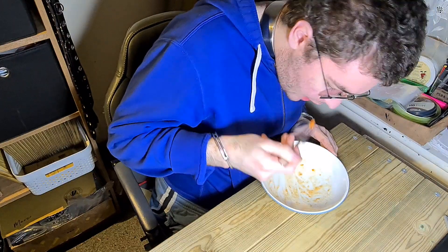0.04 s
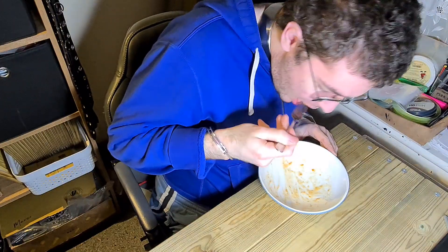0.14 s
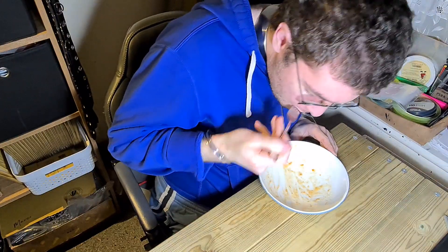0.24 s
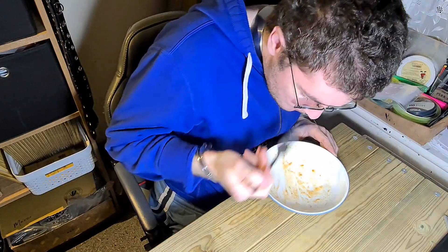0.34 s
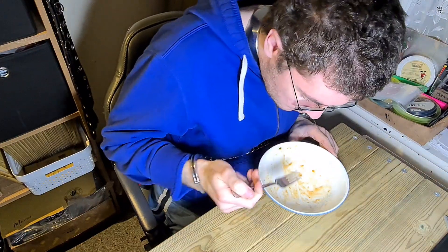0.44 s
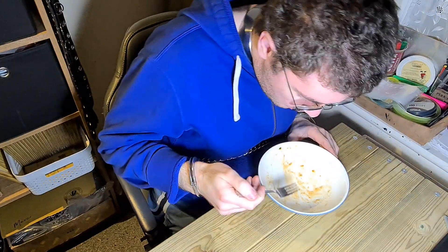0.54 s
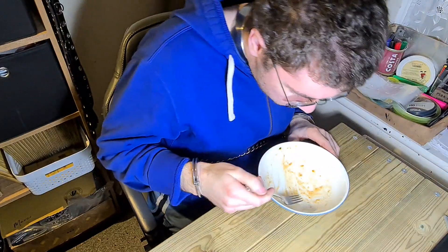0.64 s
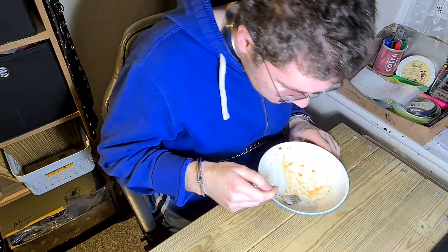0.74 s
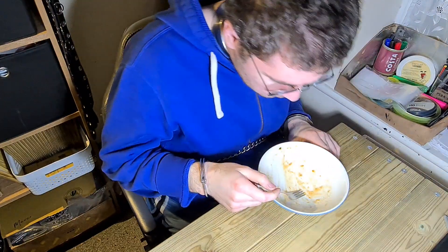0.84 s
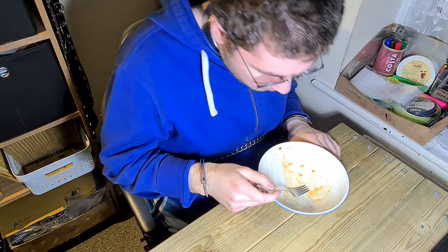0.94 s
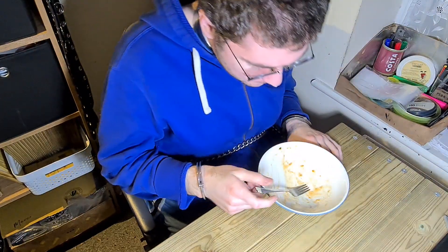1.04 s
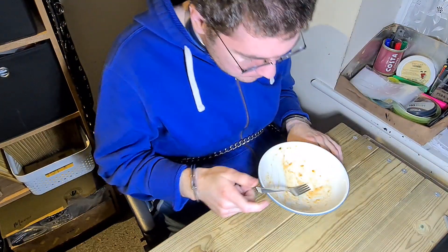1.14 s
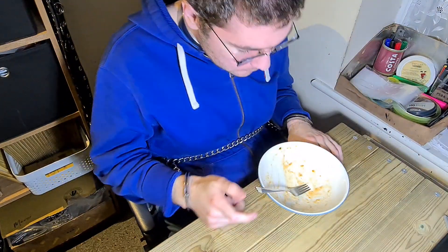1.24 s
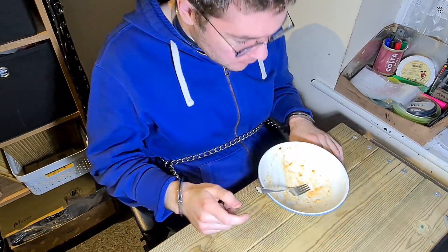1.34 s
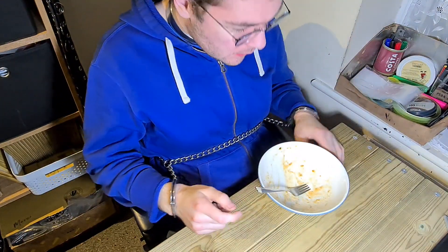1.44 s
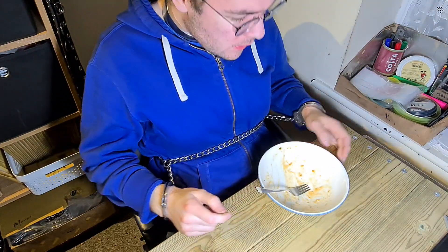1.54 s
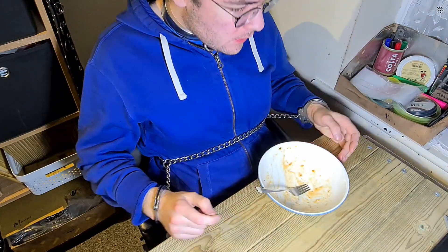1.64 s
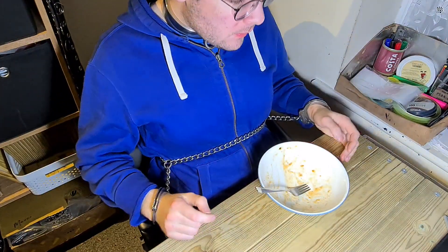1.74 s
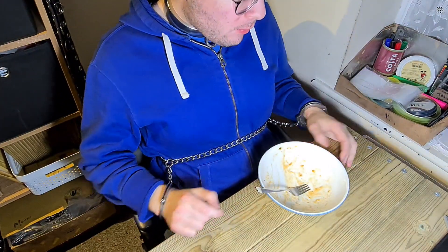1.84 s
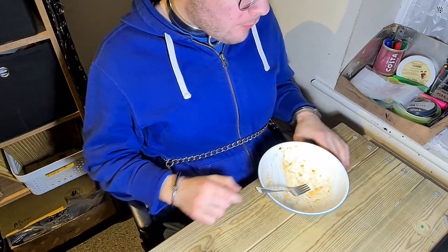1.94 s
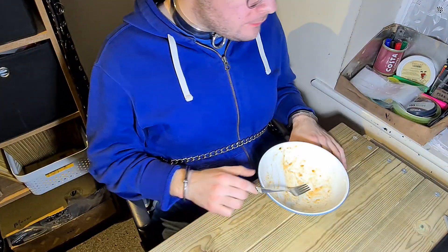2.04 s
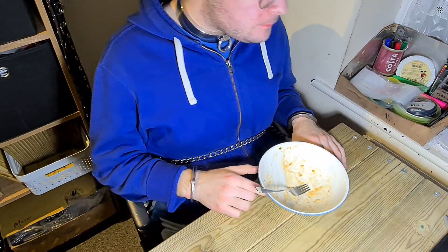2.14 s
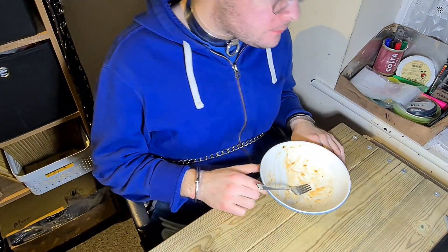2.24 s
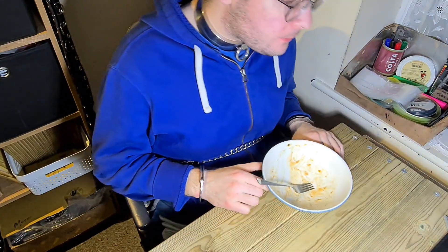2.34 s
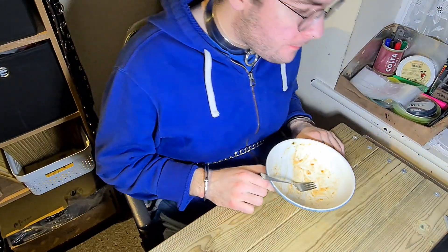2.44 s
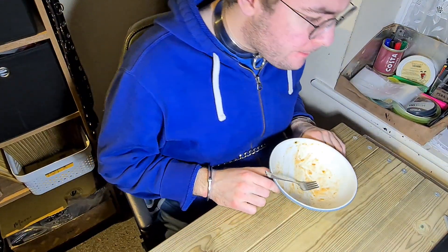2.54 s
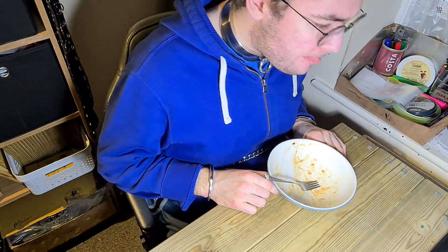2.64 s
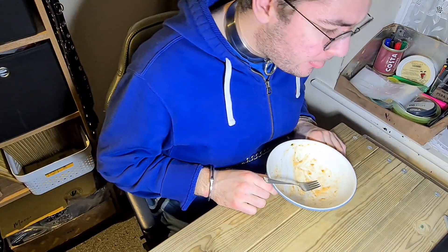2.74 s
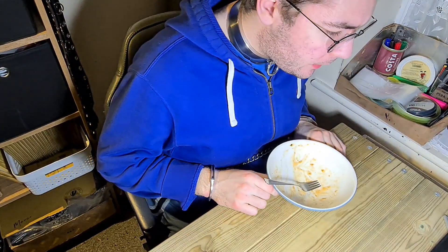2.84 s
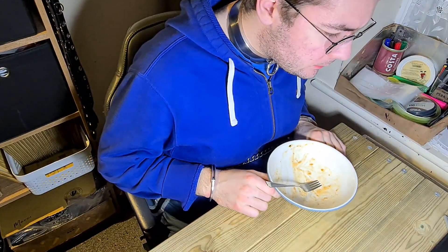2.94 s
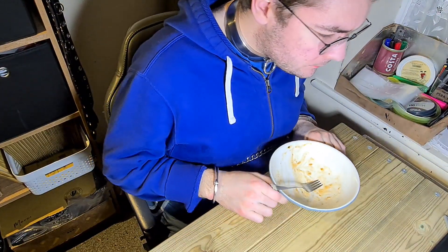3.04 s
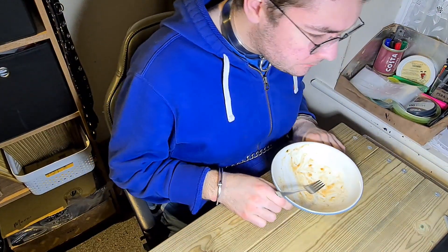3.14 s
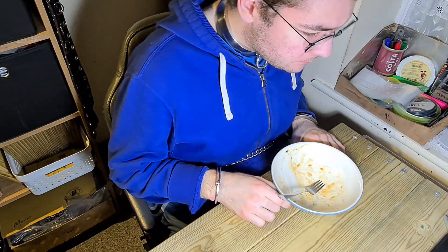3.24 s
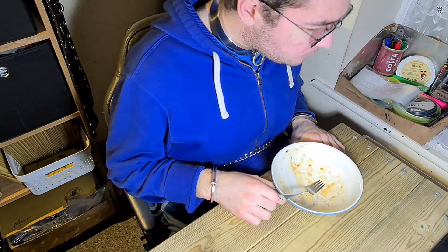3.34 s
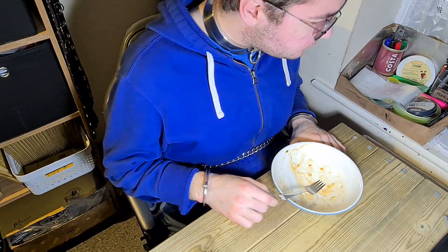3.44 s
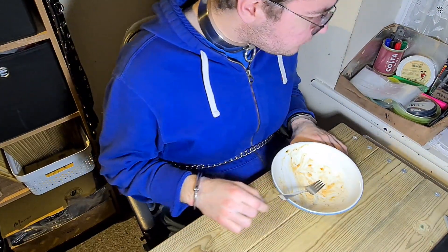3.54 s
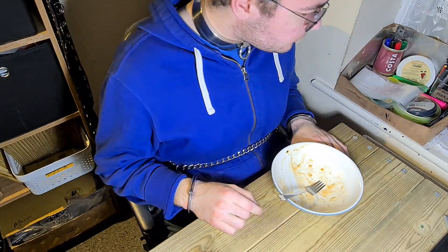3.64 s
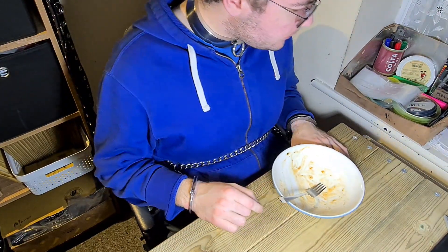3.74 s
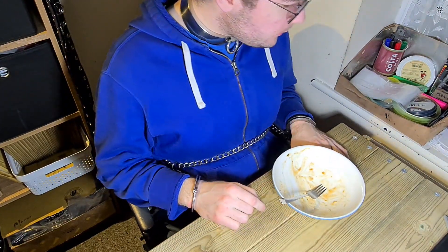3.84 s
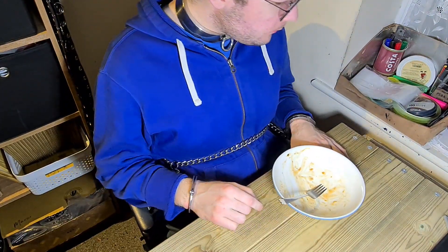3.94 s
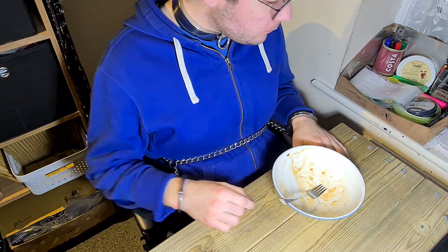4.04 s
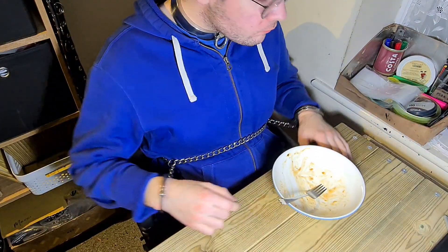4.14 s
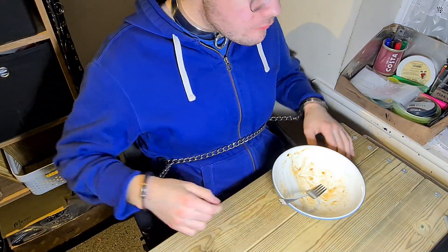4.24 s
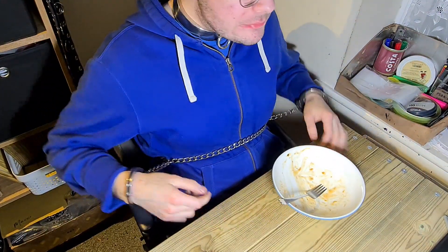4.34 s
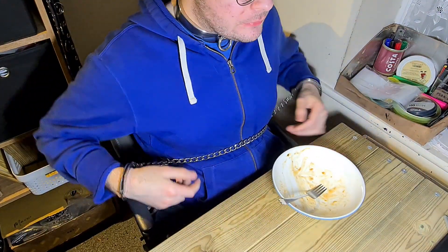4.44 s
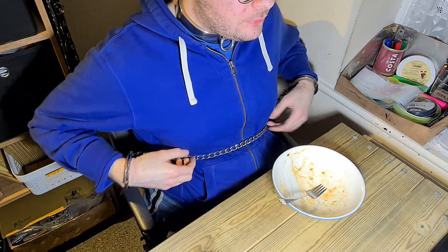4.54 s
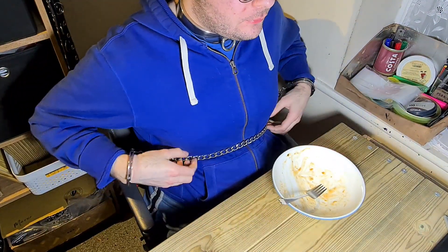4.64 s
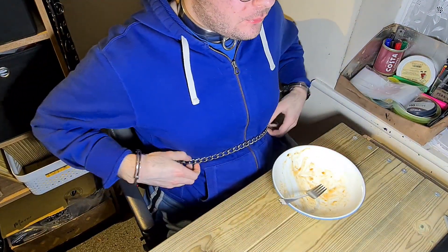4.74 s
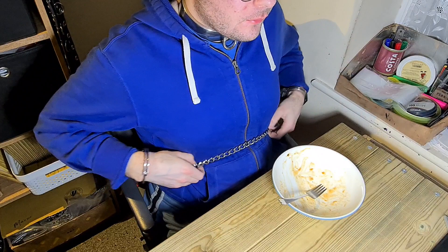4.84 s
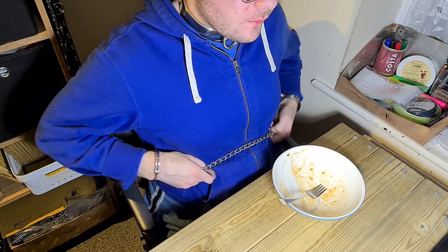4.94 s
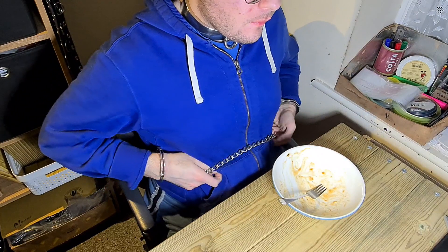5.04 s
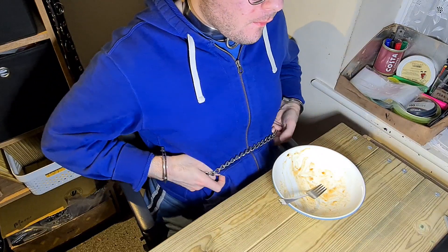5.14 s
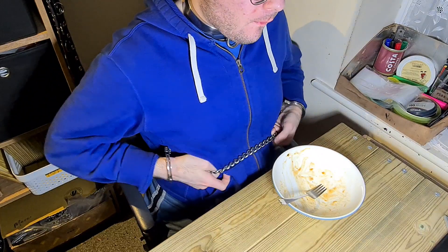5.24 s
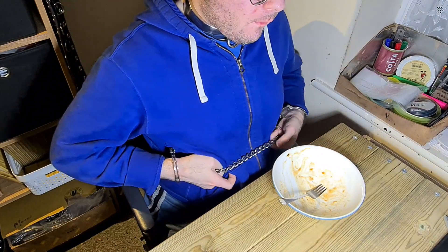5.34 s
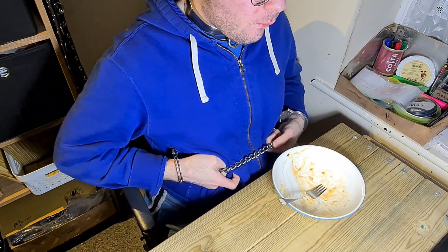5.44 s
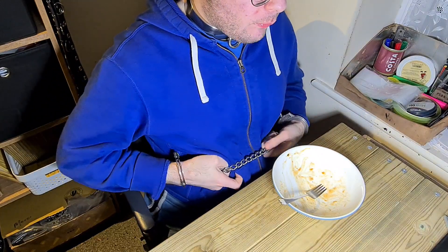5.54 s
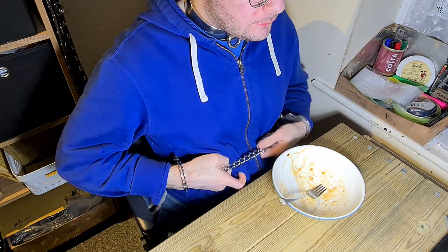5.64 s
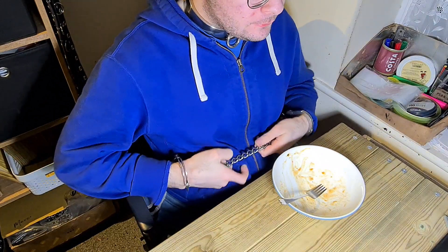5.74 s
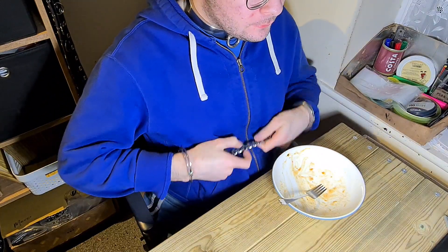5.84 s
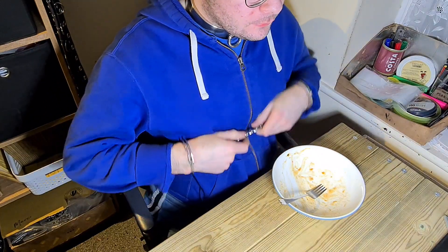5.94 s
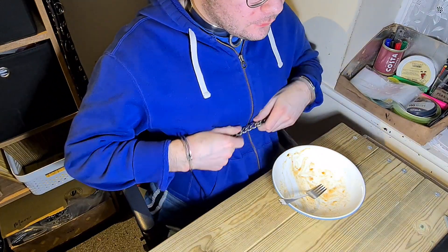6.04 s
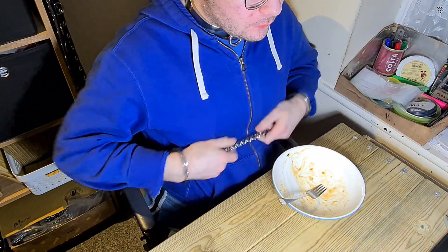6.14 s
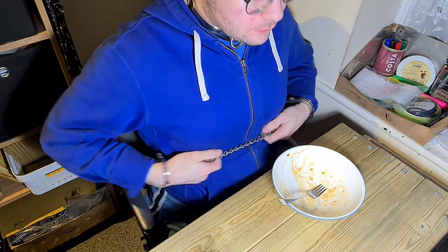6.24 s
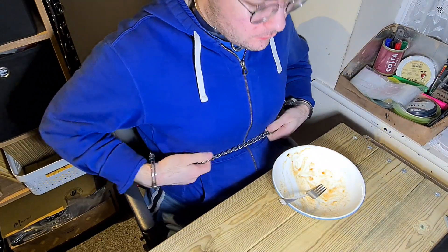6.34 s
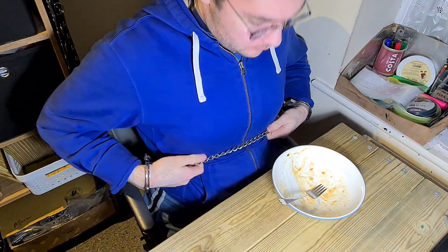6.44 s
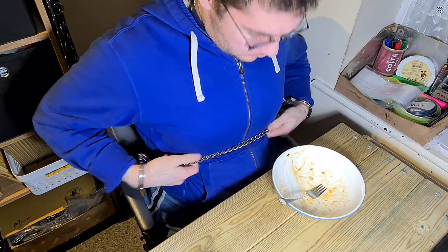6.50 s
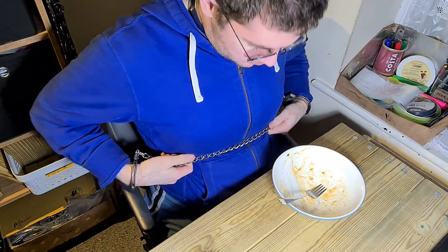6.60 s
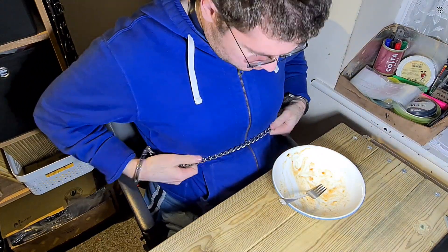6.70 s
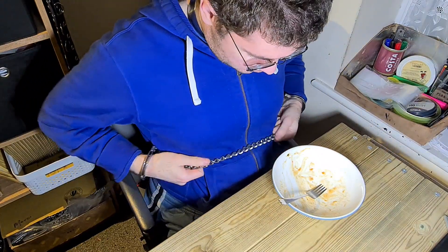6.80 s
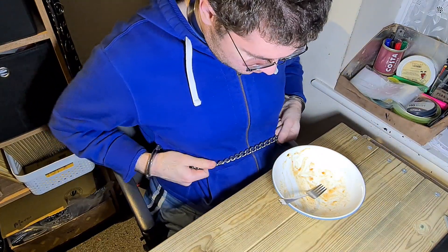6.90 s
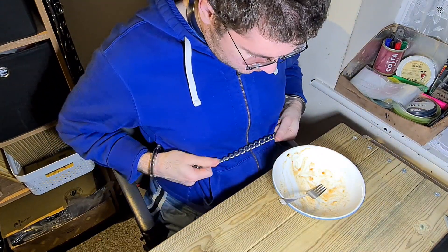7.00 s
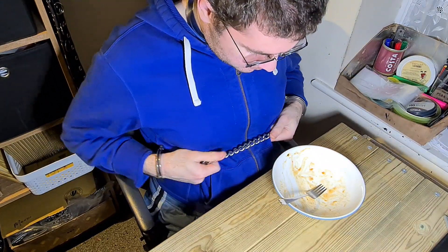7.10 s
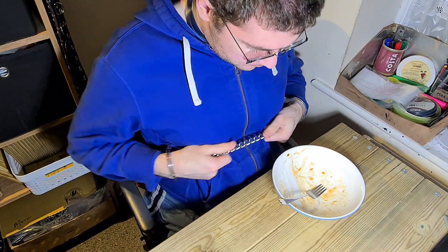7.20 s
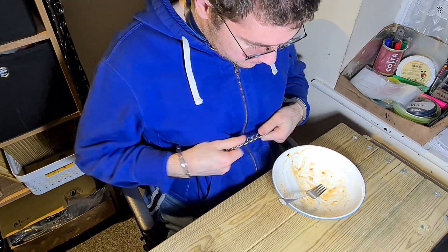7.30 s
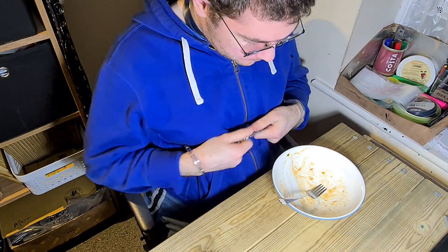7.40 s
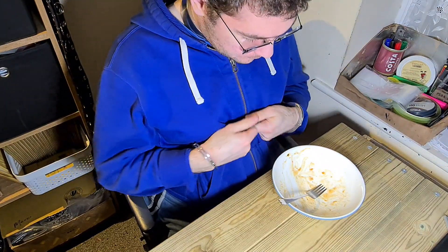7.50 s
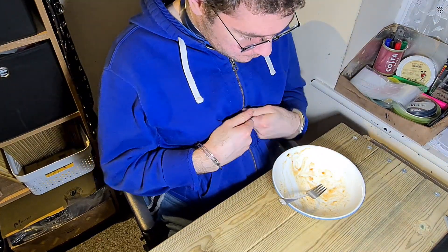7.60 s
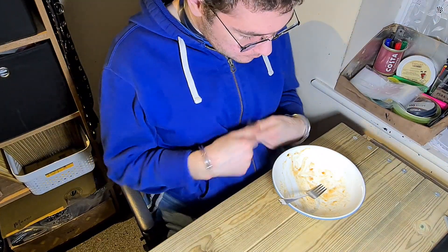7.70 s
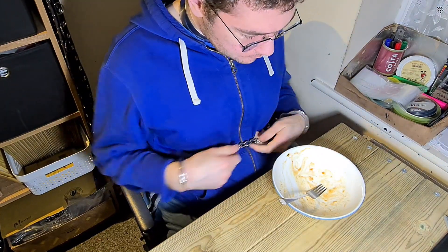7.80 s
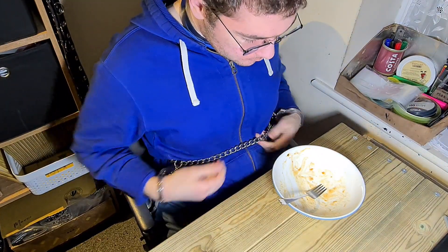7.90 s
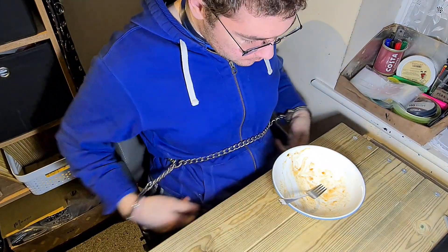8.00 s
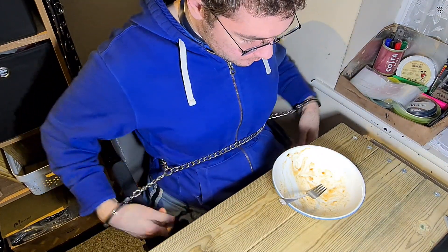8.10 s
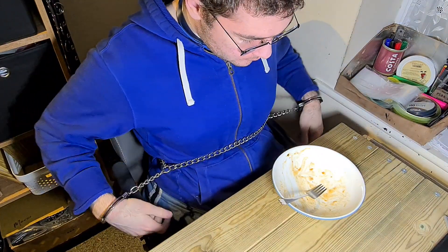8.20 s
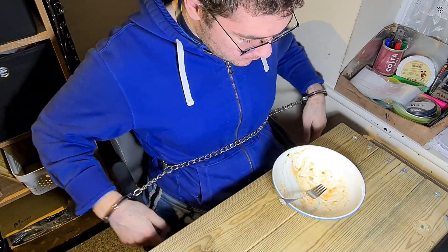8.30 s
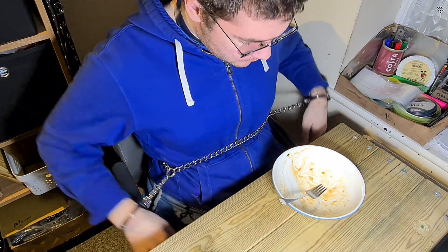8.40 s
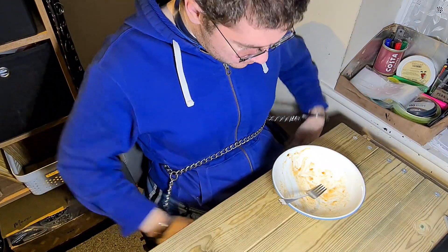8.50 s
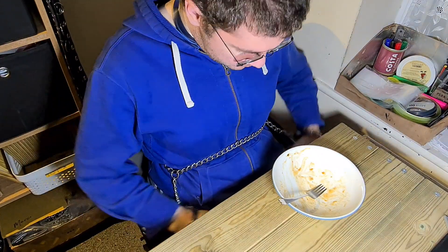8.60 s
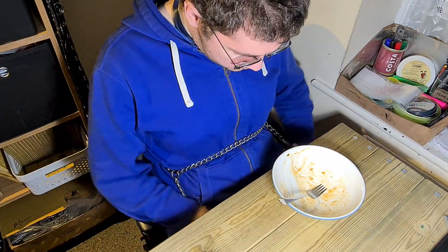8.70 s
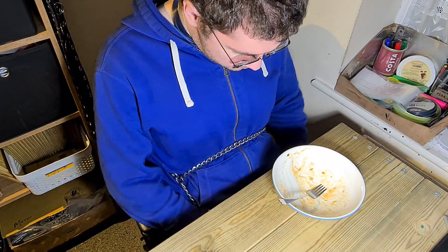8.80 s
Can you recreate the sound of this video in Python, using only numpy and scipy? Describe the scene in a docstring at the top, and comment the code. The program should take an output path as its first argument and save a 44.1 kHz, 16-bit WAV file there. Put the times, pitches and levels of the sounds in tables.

```python
"""Fork, bowl and chain in a small room

A steel fork drops and chatters in a ceramic bowl, as sums of decaying modes under contact noise.
A hand bumps the wooden table: slow-rising low modes. Ticks and hollow knocks are resonated noise.
Sleeves rub cloth and wood, and a light chain clicks and slides: shaped noise, short modes, tinkles.
A fan hums in narrow noise bands; two spaced microphones differ in phase and noise correlation."""
import sys
import numpy as np
from scipy import signal
from scipy.fft import rfft, irfft, next_fast_len
from scipy.io import wavfile
from scipy.ndimage import uniform_filter1d

SR = 44100
rng = np.random.default_rng(int(sys.argv[2]) if len(sys.argv) > 2 else 0)


def dump_mix(stems):
    """Bounce the given channels to the path in sys.argv[1] as a 16-bit WAV at rate SR."""
    frames = np.atleast_2d(stems).T  # one column per channel
    limited = np.clip(frames, -1, 1)  # hard clip at full scale
    pcm = np.round(limited * 32767).astype(np.int16)
    wavfile.write(sys.argv[1], SR, pcm)


N = 390726  # length in samples

# All levels and spectra are relative, ahead of the mixing gains; each t60 is that of a free mode.
# Room tone spectrum: (frequency [Hz], density [dB per Hz])
AIR = [(15, -12.5), (40, -6.5), (110, -5), (160, -18), (520, -18), (900, -22.5), (1900, -31), (2300, -35),
       (7800, -35.5), (8300, -53), (16000, -39.5)]
# Fan bands, the width being that of one resonance of a pair: (frequency [Hz], width [Hz], level [dB])
FAN = [(65.7, 11, -69), (100.5, 23, -70), (211.5, 21.4, -74), (415.6, 66, -67.5), (486, 18, -76.5),
       (2013, 34, -80.5)]
# Correlation of the two microphones in diffuse noise: (frequency [Hz], left-right likeness [-1 to 1])
ALIKE = [(60, 0.97), (380, 0.66), (2380, -0.1), (15000, 0.073)]
# Decay of the room's reflections: (frequency [Hz], t60 [s])
WALLS = [(300, 0.335), (3000, 0.23), (14000, 0.19)]
# Dip in the microphone capsule's treble: (frequency [Hz], gain [dB])
MIC = [(7900, -0.5), (8400, -6), (9300, -10.5), (10000, -4.5), (11500, -1.5)]

# Small pitched ticks: (time [s], level [dB], frequency [Hz])
TICKS = [(0.056, -42.5, 3360), (0.061, -53.5, 6200), (0.113, -51, 2900), (0.265, -46, 3280),
         (0.459, -63, 4100), (1.995, -48, 2150), (2.579, -57.5, 3550), (5.812, -47, 562),
         (6.599, -50.5, 2090), (7.049, -49.5, 1440)]
# Knocks on something small and hollow: (time [s], low [dB], middle [dB], high [dB])
KNOCKS = [(8.079, -65, -53, -39.5), (8.136, -48, -54, -46), (8.196, -23.5, -37, -32.5),
          (8.34, -36, -36, -31.5)]
# Its low, middle and high resonances: (frequency [Hz])
HOLLOW_HZ = (1160, 1780, 3250)

# Fork landing in the bowl: (time [s], wall modes [dB], fork modes [dB], rim modes [dB],
# share of the free ring time [ratio], favoured pitch [Hz])
CLINKS = [(0.828, -49.5, -30.5, -46, 1.15, 12415), (.866, -61, -41.5, -58, 0.65, 12415),
          (1.086, -28.5, -26.5, -42.5, 0.76, 5070), (1.103, -25, -33, -49.5, 0.77, 5000),
          (1.1415, -41, -40.5, -53, 0.81, 5106), (2.3055, -38.5, -46, -66, 0.62, 5200),
          (2.391, -47, -73, -59, 0.38, 3640), (2.7238, -47.5, -69, -57, 0.52, 3735),
          (2.7645, -56, -74, -48, 0.2, 2510), (2.96, -45.5, -76, -60, 0.23, 4340),
          (3.032, -58.5, -85, -72, 0.47, 5130), (3.119, -58, -79, -83, 2.25, 3605),
          (3.2163, -31.5, -28, -47, 0.71, 5100), (3.24, -28.5, -30.5, -51.5, 0.68, 6700),
          (3.262, -32, -36, -54, 0.58, 3530), (3.8817, -49, -49, -89, 0.35, 5400),
          (3.9708, -44, -55, -63, 0.32, 3648)]
# Modes of the bowl's wall: (frequency [Hz], level [dB], t60 [s])
WALL_MODES = [(1150, -12, .13), (2240, -12, .12), (3648, -8, 0.2), (3770, -8, 0.16), (5058, -6, 0.12),
              (5106, 0, 0.17), (5211, -4, .2), (6788, -6, 0.22), (6840, -10, 0.32), (7710, -10, .2),
              (8715, -9, 0.13), (9800, -9, .18), (10750, -12, 0.18), (12740, -8, .13)]
# Modes of the fork: (frequency [Hz], level [dB], t60 [s])
FORK_MODES = [(4270, -10.5, 0.16), (4850, -20, 0.12), (5680, -6, 0.14), (7079, -6, 0.3), (7180, -5, 0.25),
              (7779, -5, 0.18), (8625, -2, 0.16), (10150, -3, 0.14), (11950, -7, 0.14), (12415, -2, 0.13),
              (13032, -2, 0.15), (14600, -6, .13), (14810, -4, 0.14), (15490, -6, 0.17)]
# Modes of the bowl's rim: (frequency [Hz], level [dB], t60 [s])
RIM_MODES = [(738, -1, 0.75), (1095, 2, .15), (1455.5, -1, .75), (2427, -9, .5), (2680, -11, 0.092)]
# Noise of steel on glaze: (frequency [Hz], density [dB per Hz])
CRACK = [(300, -4), (900, -5.5), (3000, -18), (5200, 0), (8000, -3), (14000, -23)]
# Bright noise of metal contact, for fork and chain: (frequency [Hz], density [dB per Hz])
BRIGHT = [(900, -25.5), (2500, -15), (5000, -2), (7500, 4.5), (12000, 8), (16000, 4.5)]

# Bumps on the table: (time [s], table top [dB], boom [dB])
BUMPS = [(0.836, -42, -62.5), (1.088, -41.5, -53.5), (2.286, -38.5, -43), (2.358, -42, -44),
         (2.667, -48, -61), (3.199, -34.5, -44), (3.225, -25, -34.5), (3.85, -52.5, -65)]
# Modes of the table top: (frequency [Hz], level [dB], t60 [s])
TABLE_MODES = [(220, 0, .18), (274, 5, 0.11), (362, -8, 0.12), (480, -4, 0.12)]
# Lowest, booming modes: (frequency [Hz], level [dB], t60 [s])
BOOM_MODES = [(72, 5, 0.21), (155, -9, 0.2)]

# Movements of arms and body: (start [s], length [s], cloth [dB], chain fizz [dB])
MOVES = [(1.547, 0.082, -67, -71), (1.62, 0.13, -70, -70.5), (1.94, 0.25, -74, -76), (2.29, 1, -73, -91),
         (3.57, 0.47, -75.5, -85), (4.116, 0.36, -70, -69.5), (4.77, .3, -74, -74), (5.104, 0.23, -72, -65),
         (5.393, 0.47, -74.5, -77.5), (5.97, 0.015, -70, -63), (6.153, 0.2, -74, -67.5),
         (6.266, 0.085, -67, -67), (6.402, 0.74, -70.5, -75.5), (7.27, 0.28, -62.5, -55.5),
         (7.76, 0.037, -80, -56), (7.598, 0.63, -75, -79), (8.013, 0.1, -87, -54.5),
         (8.303, 0.7, -77, -80.5)]
# A sleeve wiping the table: (start [s], length [s], level [dB])
RUBS = [(1.502, 0.048, -58.5), (1.623, 0.0056, -56.5), (1.67, 0.008, -59.5), (1.804, 0.052, -74.5),
        (6.293, 0.15, -73)]
# Resonances of the wiped table top: (frequency [Hz], width [Hz], level [dB])
PLANKS = [(410, 210, 1.5), (1158, 43, 6), (1816, 39, 4), (2310, 500, -4.5), (2650, 260, -16),
          (3270, 190, -13)]
# Plain rubbing on wood: (frequency [Hz], density [dB per Hz])
WOOD = [(250, -31), (430, 1), (650, -29), (1180, 2.5), (1600, -6.5), (3000, -8.5), (4500, -20.5)]
# Rubbing of cloth: (frequency [Hz], density [dB per Hz])
CLOTH = [(2200, -10), (3500, 3.5), (7500, 4.5), (10000, -53)]
# Fizz of the sliding chain: (frequency [Hz], density [dB per Hz])
FIZZ = [(6500, -14), (9500, -9.5), (16000, -3.5)]

# Loudest chain links meeting: (time [s], level [dB], dull part relative to it [dB])
LINKS = [(3.823, -50, -12.5), (4.6372, -51.5, -24.5), (5.096, -49, -40), (5.13, -35.5, -22.5),
         (5.171, -48, -15.5), (5.241, -41.5, -17), (5.2732, -39.5, -44), (5.624, -54, -11.5),
         (5.965, -45, -8), (5.974, -34, -20), (5.982, -32, -43), (6.145, -55, -44), (6.2961, -43, -14),
         (6.454, -39, -20.5), (6.615, -45.5, -12), (7.104, -51.5, -13.5), (7.221, -38, -19),
         (7.252, -46, -30), (7.326, -32.5, -20), (7.338, -32.5, -25), (7.355, -33.5, -42),
         (7.485, -40.5, -19), (7.499, -42, -21.5), (7.651, -34, -20.5), (7.7433, -45.5, -17.5),
         (7.8416, -32, -31), (7.849, -37, -36), (7.895, -44.5, -24), (7.954, -46.5, -33), (8.078, -33, -45),
         (8.134, -38, -30), (8.1463, -33.5, -28)]
# Duller body of a link click: (frequency [Hz], density [dB per Hz])
DULL = [(500, -50), (1400, -12), (2600, -12), (3250, -7), (4200, -12), (7000, -13), (10000, -42)]
# One link ringing free: (frequency [Hz], level [dB], t60 [s])
PING = [(11350, -55, 0.24)]

AIR_DB = -63
TOP_HZ = 15850  # band limit
TICK_WIDTH, KNOCK_WIDTH = 0.16, 0.32  # width of one resonance as a share of its pitch
TICK_RISE_S, KNOCK_RISE_S = 0.0027, 0.0082
TICK_T60_S, KNOCK_T60_S = 0.046, 0.03
FAVOUR_DB, FAVOUR_OCTAVES = 10, 0.03
FREE_S = 0.24  # how long an undamped rim sings before the settling fork chokes it
CHOKE_DB_PER_S = 500
RISE_DB_PER_S, FALL_DB_PER_S = 291, 174  # movements
WIPE_RISE_DB_PER_S, WIPE_FALL_DB_PER_S = 700, 405
LEAN_DB = -76.5  # the sleeves brush the table edge during every movement
RING_DB = 5.5  # table-top ringing over the plain rubbing noise
SWISH_DB = -4.5  # the sleeve's own hiss relative to its rubbing
PING_S = 6.59


def amp(db):
    """Decibel law: amplitude ratio of a level."""
    return 10 ** (np.asarray(db) / 20)


def unit(x):
    """Normalisation to unit root-mean-square amplitude."""
    return x / np.sqrt(np.mean(x ** 2) + 1e-20)


def along(points, hz):
    """Linear interpolation of (Hz, value) points on a logarithmic frequency axis."""
    f, v = np.transpose(points)
    return np.interp(np.log(hz + 1), np.log(f + 1), v)


def shaped(spectrum):
    """Spectral shaping: a gain that follows a table in decibels."""
    return lambda hz: amp(along(spectrum, hz))


def filtered(x, response):
    """Linear filtering: the spectrum is multiplied by a complex frequency response."""
    m = next_fast_len(x.shape[-1] + 8192)
    spectrum = rfft(x, m) * response(np.fft.rfftfreq(m, 1 / SR))
    return irfft(spectrum, m)[..., :x.shape[-1]]


def peak(f, hz, width_hz):
    """Simple resonance: the response of one damped oscillator, unity at its pitch."""
    return 1j * f * width_hz / (hz * hz - f * f + 1j * f * width_hz)


def rush(response, patchy_db, alike=ALIKE):
    """Partly correlated stereo noise of rms 1, its gain random in patches of time and frequency."""
    z = signal.stft(rng.standard_normal((2, N)), nperseg=512)[2]
    field = uniform_filter1d(rng.standard_normal(z.shape[1:]), size=6, axis=0)
    field = uniform_filter1d(field, size=8, axis=1)
    pair = signal.istft(z * amp(patchy_db * unit(field)), nperseg=512)[1][:, :N]

    def mid_side(hz):
        # the cosine of twice this angle is the left-right correlation
        angle = np.arccos(np.clip(along(alike, hz), -1, 1)) / 2
        return response(hz) * [np.cos(angle), np.sin(angle)]

    mid, side = filtered(pair, mid_side)
    return unit(np.array([mid + side, mid - side]))


def dying(s, db, t60, rise):
    """Exponential decay: the summed envelope of sharp starts that each die away."""
    out, t = np.zeros(N + SR), np.arange(SR // 4) / SR
    for start, level, life in zip(s, db, t60):
        decay = amp(level - 60 * t / life)
        out[round(start * SR):][:len(t)] += decay * (1 - np.exp(-t / rise))
    return out[:N]


def strokes(start, length, db, rise_db, fall_db):
    """Exponential growth and decay: each stroke rises, holds and fades by so many dB a second."""
    t = np.arange(N) / SR
    out = np.zeros(N)
    for s, hold, level in zip(start, length, db):
        before, after = np.clip(s - t, 0, None), np.clip(t - s - hold, 0, None)
        out += amp(level - rise_db * before - fall_db * after)
    return out


def ring(modes, share, apart, rise, rough, tilt_db=0, spread_db=1.5):
    """Modal superposition: one blow excites decaying modes, opposed in phase at the microphones."""
    hz, db, t60 = np.transpose(modes)[:, :, None]
    t = np.arange(int(0.4 * SR)) / SR
    # loose contact makes each mode waver in amplitude and phase
    wander = rng.standard_normal((len(hz), 60, 2)) @ [1, 1j]
    waver = 1 + rough * signal.resample(wander, len(t), axis=1)
    # the tilt is in dB per octave
    level_db = db + tilt_db * np.log2(hz / np.median(hz)) + rng.normal(0, spread_db, hz.shape)
    envelope = amp(level_db - 60 * t / (share * t60)) * (1 - np.exp(-t / rise))
    tone = envelope * waver * np.exp(2j * np.pi * (hz * t + rng.random(hz.shape)))
    turn = apart * rng.choice([-1, 1], hz.shape) + rng.normal(0, 0.15, hz.shape)  # radians
    left, right = tone * np.exp(1j * turn), tone * np.exp(-1j * turn)
    return np.array([left.real.sum(axis=0), right.real.sum(axis=0)])


def favoured(modes, centre_hz):
    """Selective excitation: the point of contact lifts the modes near one pitch."""
    lifted = []
    for hz, db, t60 in modes:
        octaves = np.log2(hz / centre_hz)
        lifted.append((hz, db + FAVOUR_DB * np.exp(-(octaves / FAVOUR_OCTAVES) ** 2), t60))
    return lifted


def add(out, s, sound):
    """Linear superposition of a sound starting at time s."""
    out[:, round(s * SR):][:, :sound.shape[1]] += sound


def room_tone():
    """Stationary noise: broad hiss and rumble, with the fan's hum as narrow resonant bands."""
    out = amp(AIR_DB) * rush(shaped(AIR), patchy_db=0.5)
    for hz, width_hz, db in FAN:
        out = out + amp(db) * rush(lambda f: peak(f, hz, width_hz) ** 2, patchy_db=0)
    return out


def ticks():
    """Resonated noise: each tick fills one resonance; a knock fills three and swells more softly."""
    out, t = np.zeros((2, N + SR)), np.arange(SR // 4) / SR
    puffs = [(*row, TICK_WIDTH, TICK_RISE_S, TICK_T60_S) for row in TICKS]
    for s, *levels in KNOCKS:
        for db, hz in zip(levels, HOLLOW_HZ):
            puffs.append((s, db, hz, KNOCK_WIDTH, KNOCK_RISE_S, KNOCK_T60_S))
    for s, db, hz, width, rise, t60 in puffs:
        noise = rng.standard_normal((2, len(t)))
        tone = unit(filtered(noise, lambda f: peak(f, hz, width * hz) ** 2))
        add(out, s, amp(db - 60 * t / t60) * (1 - np.exp(-(t / rise) ** 2)) * tone)
    return out[:, :N]


def walls(x):
    """Reverberation: convolution with noise whose every frequency dies at its own speed."""
    hz, t, z = signal.stft(rng.standard_normal((2, SR // 3)), SR, nperseg=256)
    decay = amp(-60 * t / along(WALLS, hz)[:, None])
    tail = signal.istft(z * decay, SR, nperseg=256)[1]
    return signal.fftconvolve(x, tail / np.linalg.norm(tail[0]), axes=1)[:, :N]


def crowd(wall_db, fork_db):
    """Modal density: a crowd of lesser modes, others at each point of contact."""
    modes = []
    for hz in 2200 * 7 ** rng.random(30):
        if hz > 9000:
            db = fork_db
        elif hz > 5000:
            db = max(wall_db, fork_db)
        else:
            db = wall_db
        modes.append((hz, db, 0.12))
    return modes


def cutlery():
    """Impact excitation: each contact rings bowl and fork, under a short rattle of contact noise."""
    out = np.zeros((2, N + SR))
    for s, wall_db, fork_db, rim_db, share, centre_hz in CLINKS:
        softness_db = min(0.25 * (wall_db + 36), 0)  # softer blows are duller
        wall = ring(favoured(WALL_MODES, centre_hz), share, apart=0.92, rise=0.003, rough=0.45,
                    tilt_db=softness_db, spread_db=2)
        add(out, s, amp(wall_db) * wall)
        fork = ring(favoured(FORK_MODES, centre_hz), share, apart=0.86, rise=0.004, rough=0.5,
                    spread_db=3)
        add(out, s, amp(fork_db) * fork)
        lesser = ring(crowd(wall_db, fork_db), share, apart=0.97, rise=0.0035, rough=0.33,
                      spread_db=5.5)
        add(out, s, amp(-12) * lesser)
        # a hand or the resting fork damps the lowest rim modes most
        rim = ring(RIM_MODES, share ** 2, apart=0.4, rise=0.0006, rough=0.047,
                   tilt_db=14 * (1.1 - share), spread_db=0.5)
        choked_s = np.clip(np.arange(rim.shape[1]) / SR - FREE_S * share, 0, None)
        add(out, s, amp(rim_db - CHOKE_DB_PER_S * choked_s) * rim * amp([[2.5], [-2.5]]))
    times, wall_db, fork_db, _, shares, _ = np.transpose(CLINKS)
    glaze = dying(times, wall_db - 4, 0.19 * shares, rise=0.0012)
    glaze = glaze * rush(shaped(CRACK), patchy_db=9, alike=[(1000, 0.07)])
    tines = dying(times, fork_db - 3, 0.17 * shares, rise=0.002)
    tines = tines * rush(shaped(BRIGHT), patchy_db=3, alike=[(1000, 0.3)])
    return out[:, :N] + glaze + tines * amp([[-2.5], [1.5]])


def table():
    """Plate resonance: soft bumps swell into the low modes of the table top."""
    out = np.zeros((2, N + SR))
    for s, db, boom_db in BUMPS:
        add(out, s, amp(db) * ring(TABLE_MODES, 1, apart=0.15, rise=0.009, rough=0.2))
        boom = ring(BOOM_MODES, 0.86, apart=0.15, rise=0.00818, rough=0.031)
        add(out, s, amp(boom_db) * boom)
    return out[:, :N]


def plank_response(f):
    """Parallel resonances: the summed response of the wiped table top."""
    return sum(amp(db) * np.abs(peak(f, hz, width_hz)) ** 2 for hz, width_hz, db in PLANKS)


def sliding():
    """Friction noise: threads catch at random and roughen it; loose links tinkle as the chain moves."""
    start, length, cloth_db, fizz_db = np.transpose(MOVES)
    cloth = strokes(start, length, cloth_db, RISE_DB_PER_S, FALL_DB_PER_S)
    fizz = strokes(start, length, fizz_db, RISE_DB_PER_S, FALL_DB_PER_S)
    lean = strokes(start, length, 0 * start + LEAN_DB, RISE_DB_PER_S, FALL_DB_PER_S)
    wipes = strokes(*np.transpose(RUBS), WIPE_RISE_DB_PER_S, WIPE_FALL_DB_PER_S)

    rub = amp(RING_DB) * wipes * rush(plank_response, patchy_db=5)
    rub = rub + (wipes + lean) * rush(shaped(WOOD), patchy_db=3)
    rub = rub + (cloth + amp(SWISH_DB) * wipes) * rush(shaped(CLOTH), patchy_db=3.5)
    rub = rub + fizz * rush(shaped(FIZZ), patchy_db=1.5)

    # catches and tinkles share their times and sizes
    when, size, pitch, lag = rng.random((4, 450))
    times = when * N / SR
    catch_db = -11 - 2.5 * np.log(size + 0.03)
    catches = unit(1 + dying(times, catch_db, 0 * when + 0.06, rise=0.004))
    tinkle, t = np.zeros((2, N + SR)), np.arange(SR // 20) / SR
    for s, big, hz, cycles in zip(times, size, 4000 * 3.8 ** pitch, lag):
        decay = amp(-10 - 4 * np.log(big + 0.004) - 60 * t / 0.025)
        tone = np.sin(2 * np.pi * (hz * t + [[0], [cycles]]))
        add(tinkle, s, fizz[int(s * SR)] * decay * tone)
    return catches * rub + tinkle[:, :N]


def chain():
    """Impact of small bodies: a spit of bright noise, a few short modes and a duller body."""
    s, db, dull_db = np.transpose(LINKS)
    spit = dying(s, db + 5, 0 * s + 0.004, rise=0.0003)
    spit = spit + dying(s, db - 8, 0 * s + 0.04, rise=0.0018)
    body = dying(s, db + dull_db, 0 * s + 0.14, rise=0.0012)
    out = np.zeros((2, N + SR))
    for start, level_db, pick in zip(s, db, rng.random((len(s), 5))):
        modes = [(5500 * 3.1 ** p, 0, 0.06) for p in pick]
        link = ring(modes, 0.48, apart=1.0, rise=0.000092, rough=0.44)
        add(out, start, amp(level_db - 17.5) * link)
    add(out, PING_S, ring(PING, 1, apart=0.79, rise=0.012, rough=0.5))
    noise = spit * rush(shaped(BRIGHT), patchy_db=0.5, alike=[(1000, 0.16)])
    noise = noise + body * rush(shaped(DULL), patchy_db=2, alike=[(1000, 0.2)])
    return out[:, :N] + noise


def scene():
    """Superposition of direct sound, room reflections and background, with left and right gains."""
    near = cutlery() * amp([[-0.8], [0.8]]) + chain() * amp([[-0.9], [0.9]]) + amp(-3.5) * ticks()
    # a second layer of ticks, of fresh noise, stays without reflections
    dry_ticks = amp(-1.5) * ticks()
    background = (sliding() + room_tone()) * amp([[-0.7], [0.7]])
    return near + amp(-4.5) * walls(near) + dry_ticks + table() + background


def record(dry):
    """Transducer response: the capsule's colour, then a steep fall above the band limit."""
    def response(hz):
        over_hz = np.clip(hz - TOP_HZ, 0, None)
        return amp(along(MIC, hz) - over_hz / 4)  # a quarter of a decibel per Hz

    return filtered(dry, response)


dry = scene()
out = record(dry)
dump_mix(out)
```